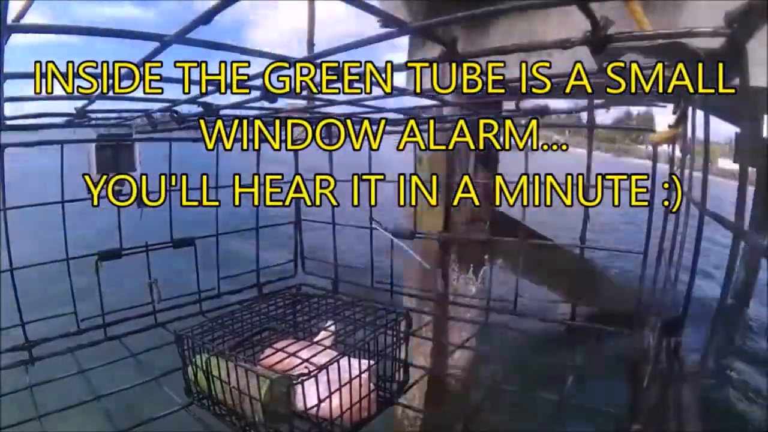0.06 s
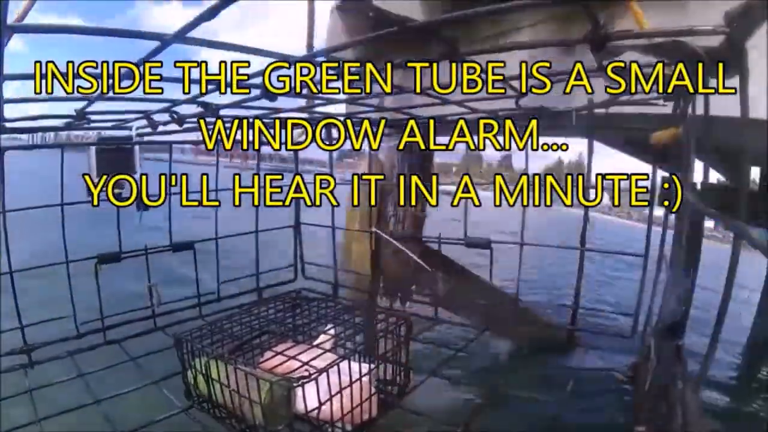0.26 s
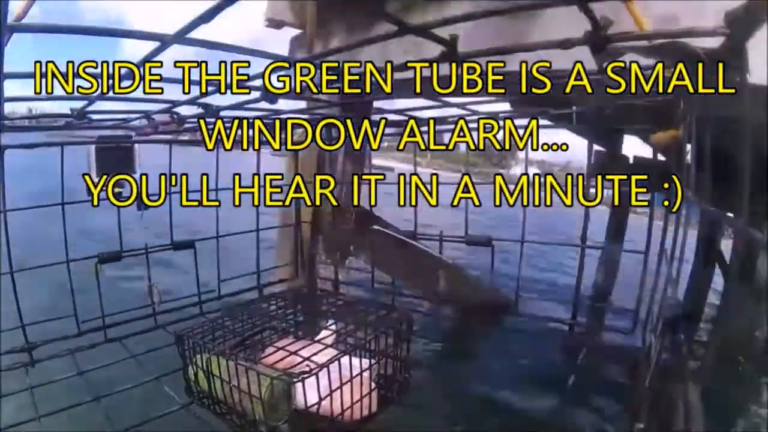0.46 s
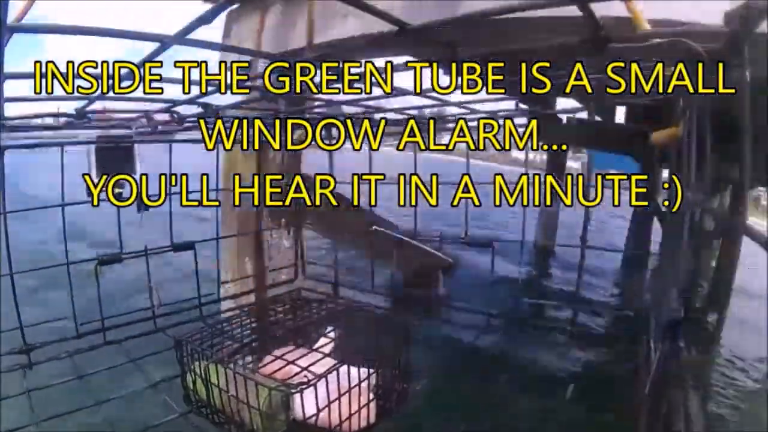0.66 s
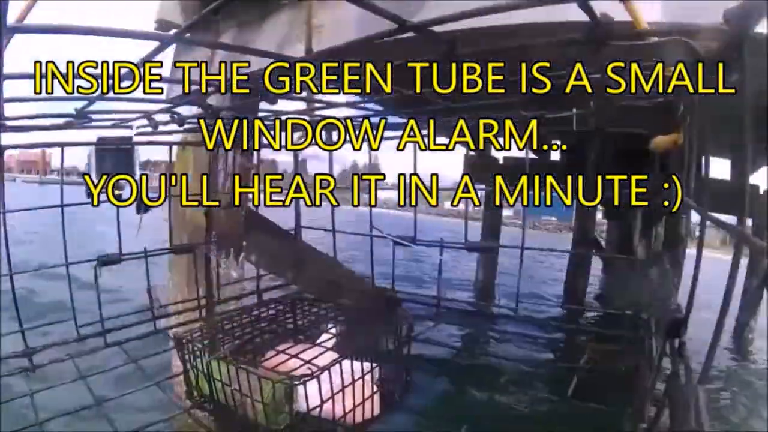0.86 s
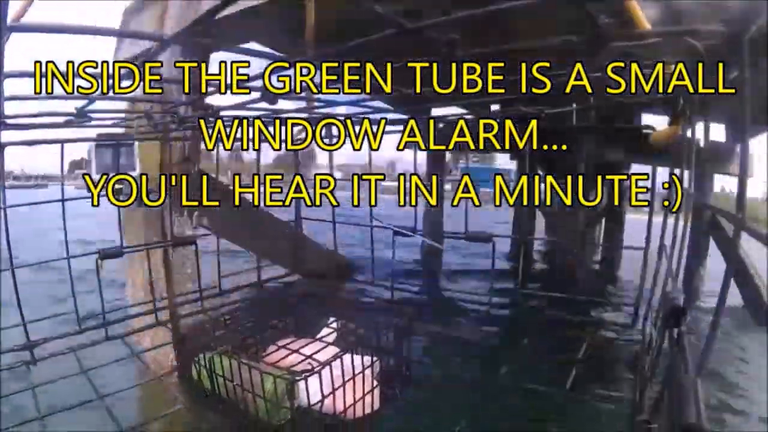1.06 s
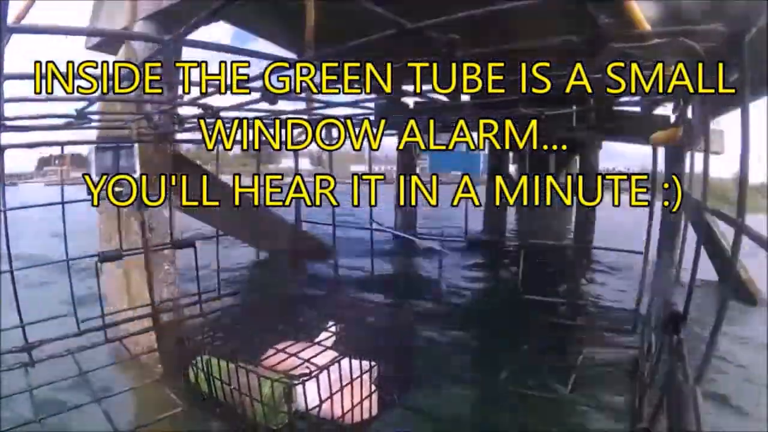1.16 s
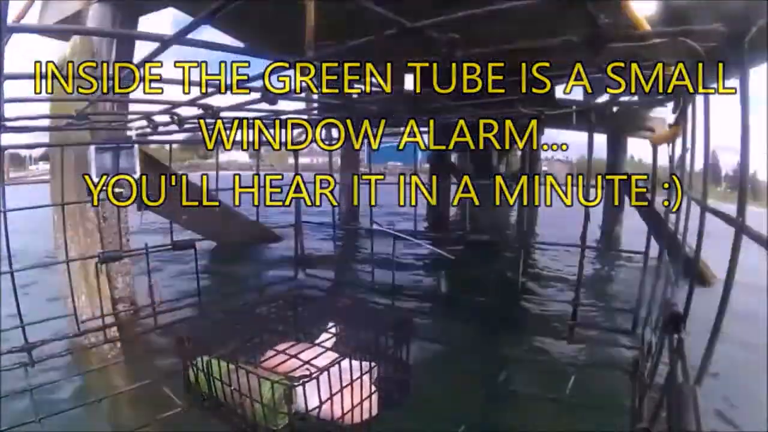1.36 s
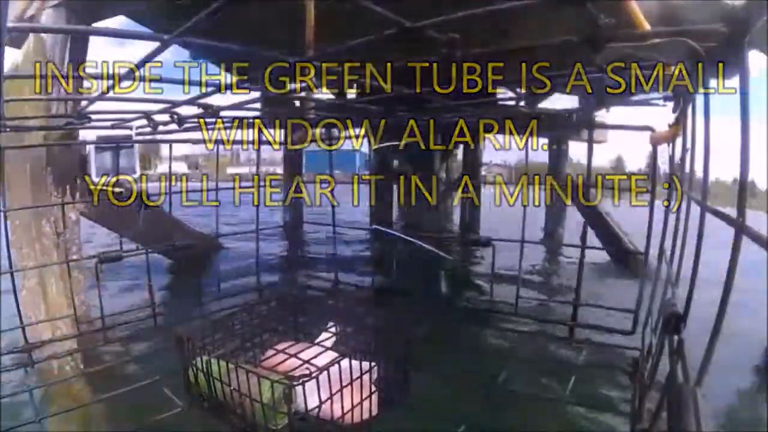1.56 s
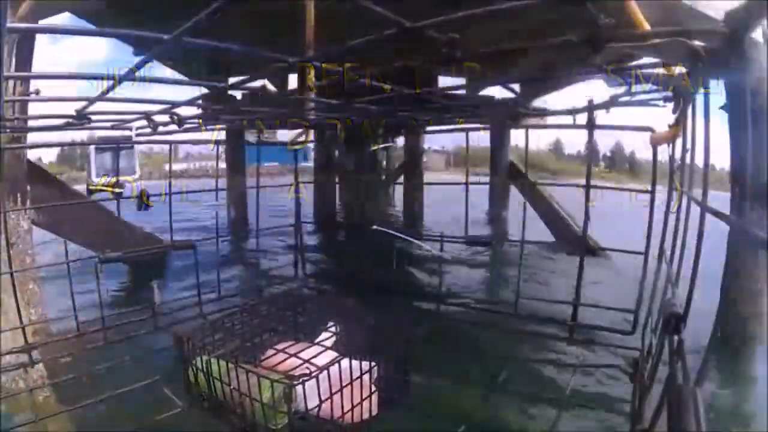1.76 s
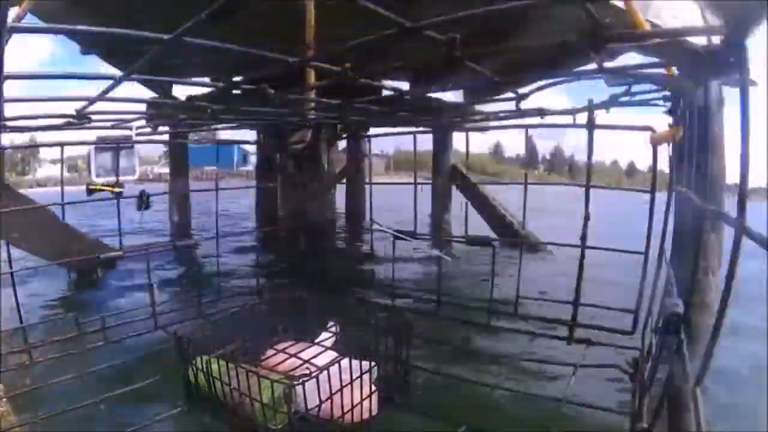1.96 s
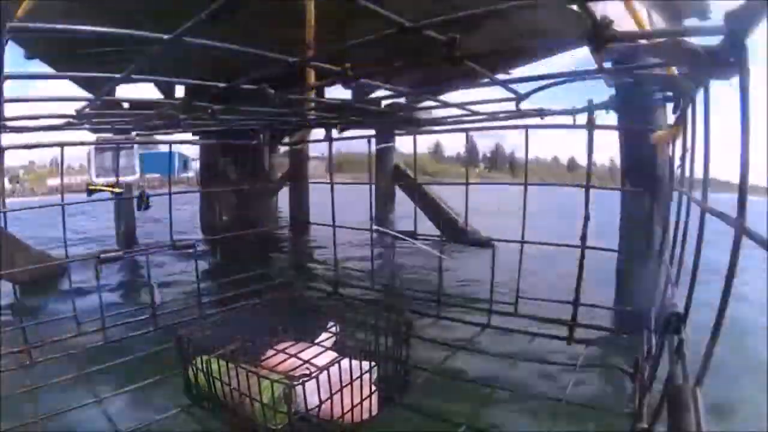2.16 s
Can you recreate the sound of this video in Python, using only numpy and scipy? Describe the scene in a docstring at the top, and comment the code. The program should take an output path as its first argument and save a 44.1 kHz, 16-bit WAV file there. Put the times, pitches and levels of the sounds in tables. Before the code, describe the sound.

A wire crab trap bumps, rattles and clicks as it drags, then settles.

```python
"""A wire crab trap with a camera fixed inside it bumps and drags three times beside a dock.
First there is only faint harbour air, a distant machine hum, and a very faint whine and whistle.
From about 0.2 s to 1 s, each bump booms in the frame and shakes the mesh, wires click against the
camera housing, and wire chatters on wire while the trap drags. Then the cage settles with a few
light taps, the last near 1.85 s, and the quiet background is left."""
import sys
import numpy as np
from scipy import signal
from scipy.fft import rfft, irfft, next_fast_len
from scipy.io import wavfile
from scipy.ndimage import map_coordinates

SR = 44100
rng = np.random.default_rng(int(sys.argv[2]) if len(sys.argv) > 2 else 0)


def persist_wave(psi):
    """Save psi, clipped to +-1, as 16-bit WAV."""
    counts = np.round(np.clip(psi, -1, 1) * 32767).astype(np.int16)
    wavfile.write(sys.argv[1], SR, np.atleast_2d(counts).T)


N = 97020  # 2.2 s

# Levels in the tables are relative. A "ring time" (t60) is how long a sound takes to fade by 60 dB.
# each bump or settling tap of the cage (time [s], frame level [dB], mesh level [dB])
BUMPS = [(.235, -21.5, -27), (0.267, -18.5, -20.5), (.290, -13.5, -23), (.342, -16, -19.5),
         (.376, -47, -23), (0.585, -19.5, -28), (.630, -22, -22), (.661, -10.5, -20.5), (0.688, -29, -23),
         (0.818, -11.5, -20.5), (.856, -21, -19.5), (.902, -18, -22), (.928, -16, -22), (0.961, -19.5, -23),
         (1.054, -26, -31.5), (1.168, -44, -35.5), (1.272, -42.5, -46.5), (1.357, -52, -47.5),
         (1.398, -49.5, -48.5)]
# tone colour of the bright crack of a wire hit (frequency [Hz], level [dB])
CRACK_COLOUR = [(1000, -30.5), (4000, -2.5), (5800, 5.5), (7500, -5.5), (11000, -5.5), (16000, -22)]


def amp(db):
    """Turn decibels into a number to multiply by."""
    return 10 ** (np.asarray(db) / 20)


def unit(x):
    """Scale x to an average (rms) strength of 1."""
    return x / np.sqrt(np.mean(x ** 2) + 1e-20)


def along(points, hz):
    """Read between (frequency, value) points, on a log frequency scale."""
    freqs, values = np.transpose(points)
    return np.interp(np.log(hz + 1), np.log(freqs + 1), values)


def fall(t, t60):
    """A fade that loses 60 dB every t60 seconds."""
    return np.exp(-np.log(1000) * t / t60)


def wobble(rate):
    """A smooth curve through `rate` random values a second."""
    return map_coordinates(rng.standard_normal(N // 100), [np.arange(N) * rate / SR], mode="wrap")


def add(track, start_s, x):
    """Mix x into the track from start_s on."""
    i = round(start_s * SR)
    track[..., i:i + x.shape[-1]] += x[..., :N - i]


def coloured(x, colour):
    """Filter x to a tone colour given as (frequency [Hz], level [dB]) points."""
    size = 2 * next_fast_len(N)
    cepstrum = irfft(np.log(amp(along(colour, np.fft.rfftfreq(size, 1 / SR)))))
    cepstrum[1:size // 2] *= 2  # folded so the filter rings only after a hit, never before
    cepstrum[size // 2 + 1:] = 0
    return irfft(rfft(x, size) * np.exp(rfft(cepstrum)), size)[..., :N]


def ring(tones, t, detune):
    """The fading tones of a struck object; each hit shifts their pitches by about the fraction detune."""
    return sum(amp(db) * fall(t, t60) * np.sin(2 * np.pi * hz * (1 + detune * rng.normal()) * t)
               for hz, db, t60 in tones)


def harbour():
    """A distant machine hums, slightly unsteady, in the open air; both slowly fade."""
    # tones of the machine (frequency [Hz], level [dB])
    hum_tones = [(65.36, -60), (261, -63.5), (330, -68), (393, -58.5), (456, -67), (620, -67), (857, -58.5),
                 (916, -60), (1184, -72.5), (1000, -73), (1335, -67), (1406, -64.5), (1530, -70.5),
                 (1604, -69.5), (12300, -76)]
    # tone colour of the air (frequency [Hz], level [dB])
    air_colour = [(15, -38.5), (25, 0.5), (70, -3), (240, -12.5), (394, -8.5), (516, -15.5), (887, -13.5),
                  (1650, -20.5), (2220, -21), (2410, -25), (16000, -35)]
    # how alike the air is on the left and right (frequency [Hz], likeness [0 to 1])
    likeness = [(100, 1), (2000, 0.49), (5000, 0.92), (9000, 1)]
    t, left_right = np.arange(N) / SR, np.array([[1], [-1]])
    lean_left_db, drift_rad, spread_rad, fade_db_per_s = 1.5, 0.25, 0.17, 1.92
    hum = 0
    for hz, db in hum_tones:
        gain = amp(db + 3 + lean_left_db * left_right + 0.39 * wobble(4.4))
        phase = 2 * np.pi * hz * t + drift_rad * wobble(6.94)
        hum += gain * np.sin(phase + left_right * spread_rad * rng.choice([-1, 1]))
    # mid is the noise both ears share, side is the noise that sets them apart
    width = np.arccos(np.clip(along(likeness, np.fft.rfftfreq(N, 1 / SR)), -1, 1)) / 2
    noise = irfft(rfft(rng.standard_normal((2, N))) * [np.cos(width), np.sin(width)], N)
    mid, side = coloured(noise, air_colour)
    air = amp(-52.5) * unit(mid + left_right * side)
    return (hum + air) * amp(-fade_db_per_s * t)


def whine():
    """A very faint thin whine and the octave below it sweep down and up, over and over."""
    low_hz, sweep_hz_per_s, loudest_hz, width_hz = 3340, 45000, 4280, 560
    lowest_at_s, period_s = 1.251, 0.13
    cycles = (np.arange(N) / SR - lowest_at_s) / period_s
    from_lowest_s = np.abs((cycles + 0.5) % 1 - 0.5) * period_s
    hz = low_hz + sweep_hz_per_s * from_lowest_s
    phase = 2 * np.pi * np.cumsum(hz) / SR
    gain = np.exp(-((hz - loudest_hz) / width_hz) ** 2)
    return gain * (amp(-65.5) * np.sin(phase) + amp(-64) * np.sin(phase / 2))


def whistle():
    """A very faint whistle holds one pitch and swells unevenly."""
    # brief swells of the whistle (time [s], level [dB])
    swell_peaks = [(1.267, -67), (1.349, -67), (1.475, -66), (1.585, -77), (1.82, -72), (2.001, -65.5)]
    pitch_hz, held_db, swell_s = 2480, -70.5, 0.024
    t = np.arange(N) / SR
    swells = sum(amp(db) * np.exp(-((t - s) / swell_s) ** 2) for s, db in swell_peaks)
    return (amp(held_db + 2 * wobble(22)) + swells) * np.sin(2 * np.pi * pitch_hz * t)


def wire_taps():
    """As the cage settles, a loose wire is tapped and rings briefly."""
    # taps on the wire (time [s], level [dB])
    taps = [(1.042, -26.5), (1.135, -32), (1.167, -35.5), (1.197, -45.5), (1.274, -43), (1.359, -46),
            (1.397, -54), (1.849, -42)]
    # tones of the wire (frequency [Hz], level [dB], ring time [s])
    wire_tones = [(1185, -7.5, 0.13), (1390, -9.5, 0.18), (1450, -3.5, 0.089), (1620, -1, 0.083),
                  (1835, -7.5, 0.092)]
    out, t = np.zeros(N), np.arange(SR // 3) / SR
    rise = 1 - np.exp(-t / 0.002)
    for s, db in taps:
        add(out, s, amp(db) * ring(wire_tones, t, detune=0.0079) * rise)
    return out


def drag_chatter():
    """While the trap drags, countless small contacts rattle the wires; a few stand out as dry ticks."""
    # the three drags (start [s], end [s], level [dB])
    drags = [(0.303, 0.379, -23.5), (0.663, 0.722, -37.5), (0.829, 0.975, -24)]
    # tone colour of wire rattling on wire (frequency [Hz], level [dB])
    chatter_colour = [(30, 13), (160, 14), (400, 7), (780, 1.5), (1160, 8), (1900, -0.5), (2600, -4),
                      (3300, -10), (4200, -7.5), (5500, -14.5), (8000, -35.5), (12000, -24), (16000, -66)]
    t, rise_s, release_s = np.arange(N) / SR, 0.018, 0.18
    force = sum(amp(db) * np.clip((t - start) / rise_s, 0, 1) * fall(np.maximum(t - end, 0), release_s)
                for start, end, db in drags)

    def contacts(per_s):
        return unit((rng.random(N) < per_s / SR) * rng.uniform(-1.08, 1, N))

    ticks = amp(-37.5) * unit(coloured(contacts(per_s=270), CRACK_COLOUR))
    rattle = unit(coloured(contacts(per_s=450) + 0.2 * rng.standard_normal(N), chatter_colour))
    return force * rattle + np.sqrt(force) * ticks


def housing_clicks():
    """Wires hit the camera housing: a knock, a higher snap, and a bright crack with a brief sizzle."""
    # wire hits (time [s], knock level [dB], snap level [dB], crack level [dB])
    hits = [(0.273, -9.5, -16, -28), (0.2943, -30, -30, -41), (0.3164, -26, -44, -28.5),
            (0.345, -20.5, -28, -26.5), (0.3714, -24, -31, -26), (.378, -26.5, -26, -55),
            (0.3803, -21.5, -29.5, -64), (0.3983, -29, -33.5, -36.5), (0.41, -34, -54, -52),
            (0.553, -40.5, -62, -50.5), (0.573, -54, -45, -44), (0.591, -32.5, -40, -43.5),
            (0.6344, -23, -26, -43), (0.6654, -12, -13, -31), (0.6757, -43, -28, -34.5),
            (0.678, -20, -32.5, -32.5), (.6922, -29.5, -25.5, -42), (0.6992, -21.5, -32, -49),
            (0.8214, -20.5, -21.5, -36.5), (0.849, -43, -35, -48), (0.8754, -37, -40, -65),
            (.881, -33, -30.5, -67), (0.9046, -49, -59, -35), (0.9130, -18, -28, -33),
            (0.9304, -50, -52, -21), (0.9375, -16.5, -17, -50), (0.9405, -39, -41, -33.5),
            (0.9564, -39, -25.5, -26.5), (.9845, -23, -26.5, -22.5), (1.041, -43, -44, -51),
            (1.1378, -47, -52, -46), (1.213, -51, -55, -52)]
    # lower tones of the housing (frequency [Hz], level [dB], ring time [s])
    knock_tones = [(1262, 1, 0.01), (1874, 11.5, 0.0058), (2770, 0, 0.007)]
    # higher tones of the housing (frequency [Hz], level [dB], ring time [s])
    snap_tones = [(4120, -3, 0.01), (4360, 1.5, 0.0046), (5500, -17.5, 0.0079)]
    out, t = np.zeros((2, N)), np.arange(SR // 8) / SR
    rise = 1 - np.exp(-t / 0.0004)

    def click(x):
        """Soften the start of x and give it the energy of 2.1 ms at strength 1."""
        return x * rise / np.sqrt(np.sum((x * rise) ** 2) / (0.0021 * SR))

    hiss = unit(coloured(rng.standard_normal((2, N)), CRACK_COLOUR))
    crack_fade = fall(t, 0.005) + amp(-24) * fall(t, 0.06)  # the slow part is the sizzle
    for s, knock_db, snap_db, crack_db in hits:
        knock = amp(knock_db) * click(ring(knock_tones, t, detune=0.03))
        snap = amp(snap_db) * click(ring(snap_tones, t, detune=0.025))
        mid, side = hiss[:, round(s * SR):][:, :len(t)] * crack_fade
        crack = amp(crack_db) * (click(mid) + amp(-10) * click(side) * np.array([[1], [-1]]))
        add(out, s, knock + snap + crack)
    return out


def mesh_ring(count=130):
    """Many short spans of wire ring, each at its own pitch; every bump shakes them in a new mix."""
    # tone colour of the mesh (frequency [Hz], level [dB])
    mesh_colour = [(90, 3.5), (170, -1.5), (330, 4.5), (480, 1.5), (780, -5.5), (1160, -1.5), (1450, -4),
                   (1880, -3), (2250, -23), (3000, -3), (4200, -16), (5000, -35)]
    # how long the spans ring (frequency [Hz], ring time [s])
    ring_times = [(150, 0.5), (400, 0.42), (800, 0.24), (1600, 0.4), (2500, 0.022), (5000, 0.15)]
    out, t = np.zeros(N), np.arange(SR * 3 // 4) / SR
    hz = 90 + 5000 * ((np.arange(count) + rng.random(count)) / count) ** 2
    gain = amp(along(mesh_colour, hz)) * hz ** (1 / 4)  # makes up for high pitches lying further apart
    rise_s = 0.003 * hz[:, None] / 1000  # higher spans build up more slowly
    envelope = (1 - np.exp(-t / rise_s)) * fall(t, along(ring_times, hz)[:, None])
    spans = envelope * np.sin(2 * np.pi * (hz[:, None] * t + rng.random((count, 1))))
    for s, _, db in BUMPS:
        mix = unit(gain * rng.standard_normal(count))
        add(out, s, amp(db) * mix @ spans * np.sqrt(2 / count))
    return out


def frame_boom():
    """Each bump pushes the whole cage with a dull thud and sets the frame booming."""
    # tones of the frame (frequency [Hz], level [dB], ring time [s])
    frame_tones = [(35, -21, 1), (67.2, -5, 0.048), (127, -6, 0.35), (155.3, 2.5, 0.23), (228, -9, 0.15),
                   (348.2, -9.5, 0.35), (440.3, -17.5, 0.3), (1152, -28, 0.86)]
    # tone colour of the thud (frequency [Hz], level [dB])
    thud_colour = [(25, -15.5), (70, 8), (120, -12.5), (300, -5), (600, -16), (1200, -41), (5000, -99.5)]
    out, t = np.zeros(N), np.arange(N) / SR
    rumble = unit(coloured(rng.standard_normal(N), thud_colour))
    rise = 1 - np.exp(-t / 0.0015)
    for s, db, _ in BUMPS:
        thud = amp(-9) * np.roll(rumble, rng.integers(N)) * fall(t, t60=0.23)
        boom = ring(frame_tones, t, detune=0.01)
        add(out, s, amp(db) * (boom + thud) * rise)
    return out


def scene():
    """Cage and background together; only the cracks and the harbour differ between left and right."""
    cage = frame_boom() + mesh_ring() + housing_clicks() + drag_chatter() + wire_taps()
    return cage + harbour() + whine() + whistle()


def record(dry):
    """The camera rounds off the hardest peaks and cuts the very lowest and highest sounds."""
    ceiling, low_cut_hz, top_hz = 0.9, 22, 16400
    soft = dry / (1 + (dry / ceiling) ** 6) ** (1 / 6)
    soft = signal.sosfilt(signal.butter(1, low_cut_hz, "highpass", fs=SR, output="sos"), soft)
    size = next_fast_len(N + SR // 2)
    below_top = np.fft.rfftfreq(size, 1 / SR) < top_hz
    return irfft(rfft(soft, size) * below_top, size)[..., :N]


dry = scene()
out = record(dry)
persist_wave(out)
```